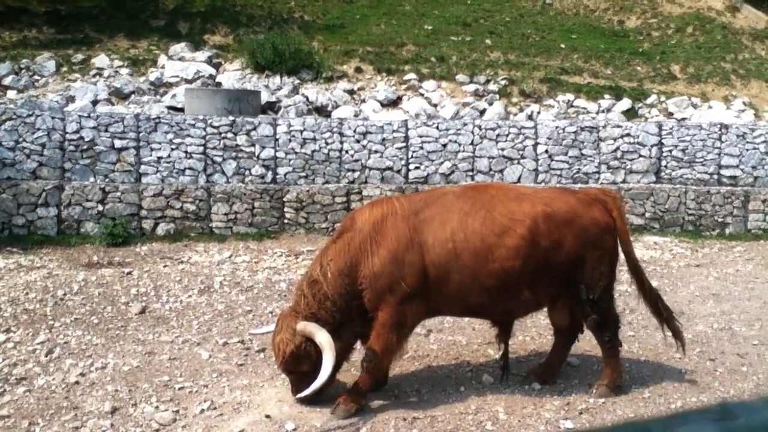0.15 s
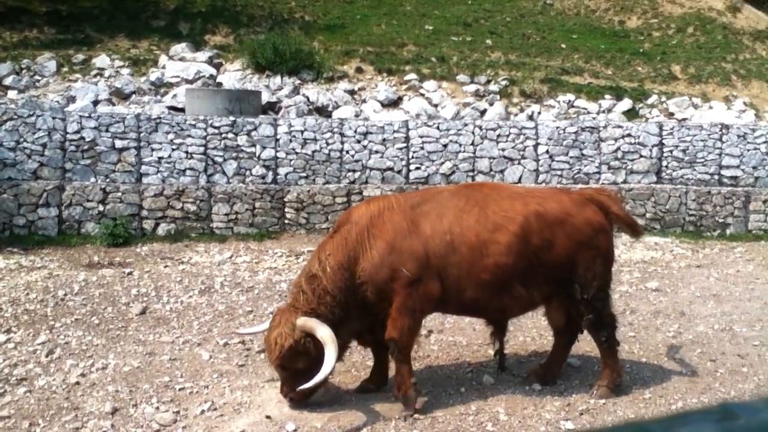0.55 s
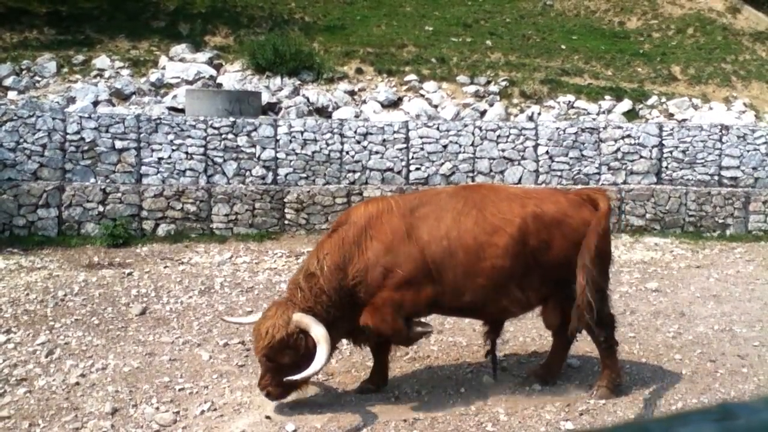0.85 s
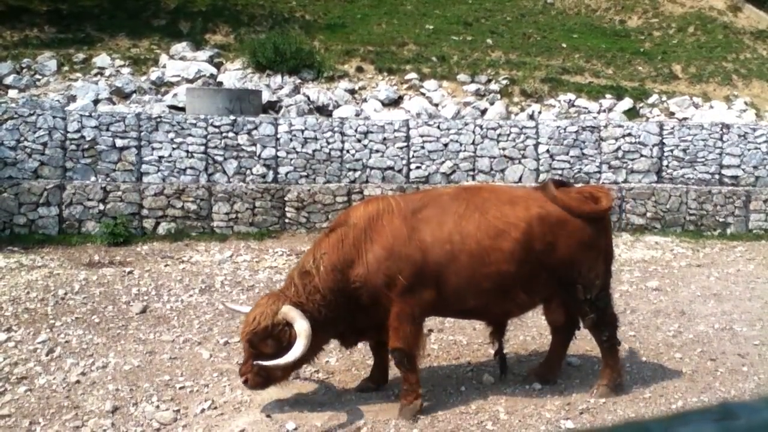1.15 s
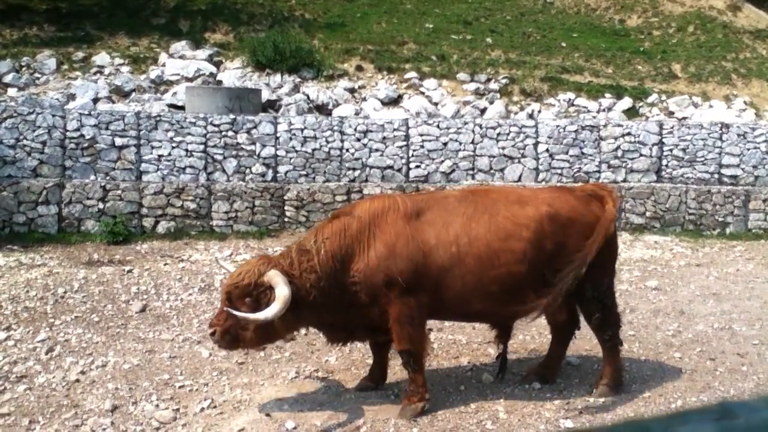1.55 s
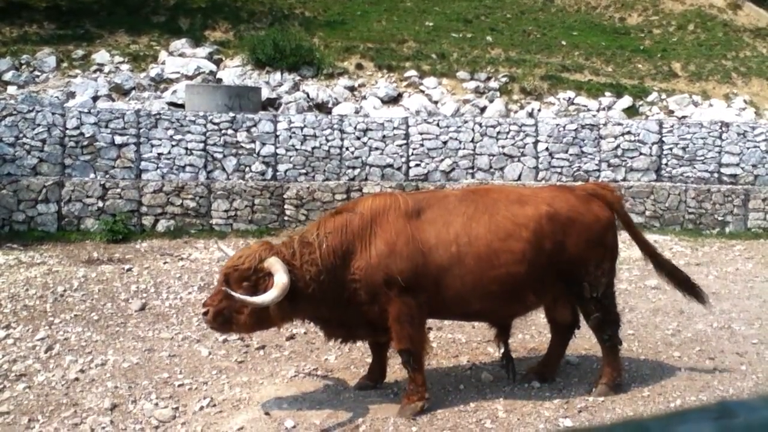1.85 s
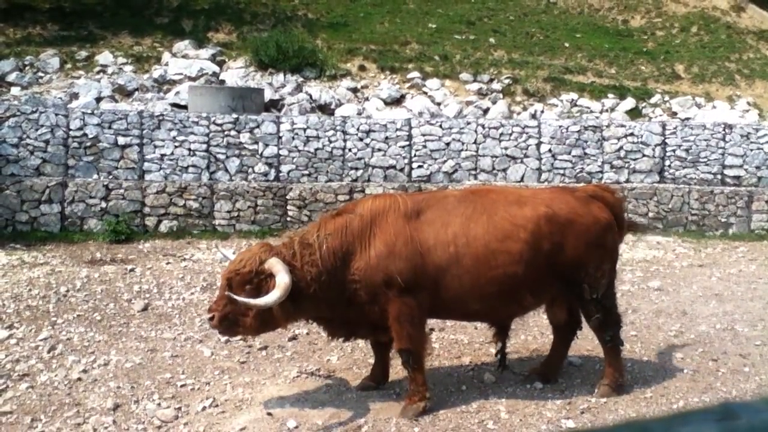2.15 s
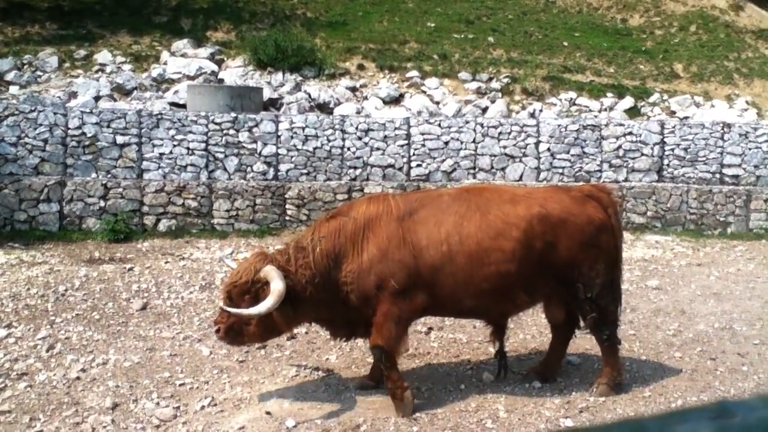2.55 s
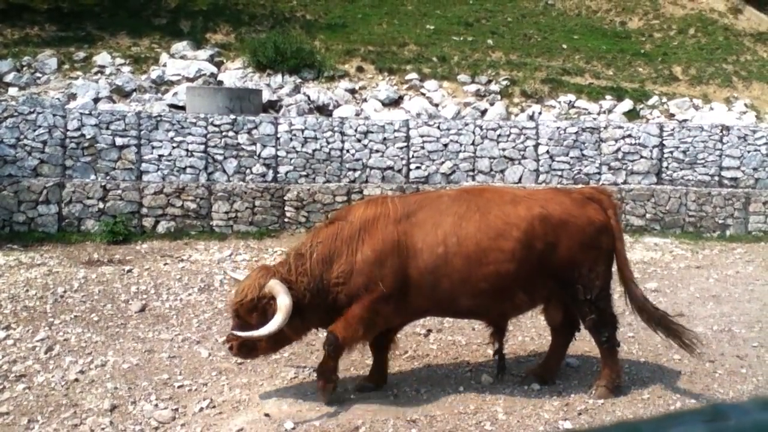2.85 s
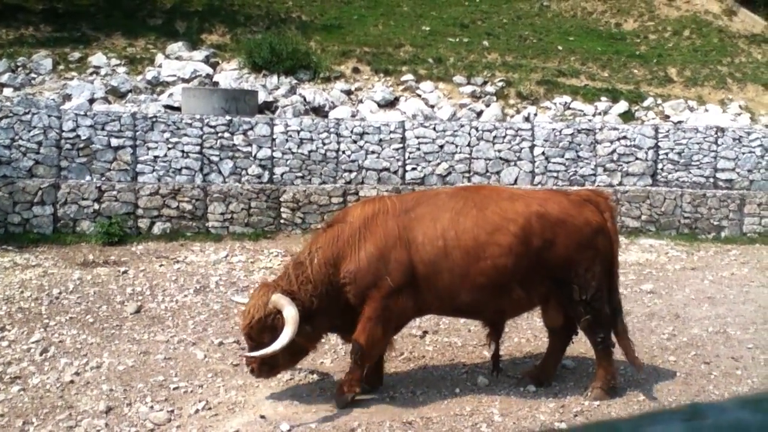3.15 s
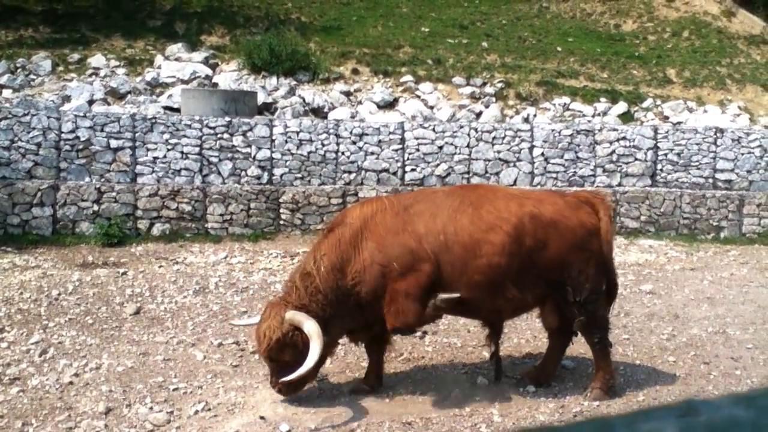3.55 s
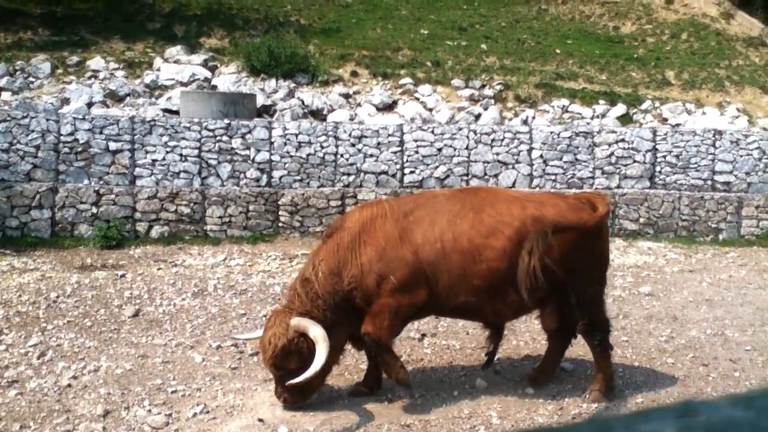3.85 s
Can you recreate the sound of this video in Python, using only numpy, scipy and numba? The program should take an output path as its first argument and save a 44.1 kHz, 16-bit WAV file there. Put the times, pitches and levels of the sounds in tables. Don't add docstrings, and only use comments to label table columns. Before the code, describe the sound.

Long deep bull bellow climbing in pitch, with hoof thuds, stone cracks and gravel crunching outdoors

```python
import sys
import numpy as np
from scipy import signal
from scipy.fft import rfft, irfft
from scipy.io import wavfile
from scipy.ndimage import uniform_filter1d
from numba import njit

SR = 44100
rng = np.random.default_rng(int(sys.argv[2]) if len(sys.argv) > 2 else 0)


def to_wav(sig):
    pcm = np.clip(np.atleast_2d(sig), -1, 1) * 32767
    pcm = np.round(pcm).astype(np.int16)
    wavfile.write(sys.argv[1], SR, pcm.T)


def voltage_ratio(level):
    return 10 ** (np.asarray(level, float) / 20)


N = 176400

# t/s, pitch f/Hz, chest level/dB, throat level/dB, nose level/dB, mouth buzz level/dB
BELLOW = [
    [(1.3, 107, -36, -49, -55, -54), (1.324, 108.4, -34, -46.5, -46.5, -49),
     (1.424, 109.1, -38, -24, -49, -54), (1.548, 113.2, -37, -26, -43, -56),
     (1.838, 119.3, -33, -22.5, -36.5, -51), (2.036, 120.4, -36, -21, -37.5, -59),
     (2.068, 124.6, -31, -23.5, -41, -62), (2.158, 125.2, -30, -27.5, -32, -53.5),
     (2.45, 128.7, -29.5, -24, -27.5, -46)],
    [(2.45, 129, -28.5, -22.5, -30.5, -68), (2.648, 132, -27, -28, -32, -61),
     (2.686, 129.7, -27.5, -26, -32, -50.5), (3.23, 130, -26, -20.5, -30.5, -68),
     (3.382, 127, -29, -20.5, -25.5, -63), (3.594, 128.6, -25.5, -21.5, -36, -45),
     (3.766, 130.4, -26, -21.5, -27.5, -79), (3.878, 137, -21.5, -21, -33, -55),
     (4.0, 145, -17.5, -20.5, -33.5, -50)],
]
ATTACK_S, PITCH_JITTER, SHIMMER_DB = 0.01, 0.0045, 0.38
# t/s, shift f/Hz, half length t/s
PITCH_JOLTS = [
    (3.298, 2, 0.031),
    (3.362, -4, 0.03115),
    (3.463, 3.5, 0.0361),
    (3.53, -2.2, 0.031),
]
# middle t/s, half length t/s, level/dB
FLUTTER_BURSTS = [(1.95, .1, -46), (2.21, 0.13, -47), (2.42, .03, -37), (2.521, .03, -36),
                  (2.63, 0.053, -33), (2.78, 0.051, -36.5), (2.992, .1, -31.5), (3.172, .03, -28.5),
                  (3.277, 0.048, -27.5), (3.371, .015, -26), (3.406, 0.015, -27.5), (3.525, 0.075, -28),
                  (3.66, 0.045, -37), (3.76, .045, -31), (3.85, .03, -32), (4.9, 0.077, -35)]
# multiple of pitch, level/dB
HALF_LINES = [(.5, -32), (1.5, 0), (2.5, -12), (3.5, -21)]
FLUTTER_PATCH_DB = 1.4
# f/Hz, width f/Hz, level/dB
MOUTH_MODES = [(1336, 80, 20), (1420, 30, -18), (1774, 43, -2), (2575, 100, -1.5)]
FOLD_BREATH, MOUTH_PATCH_DB, PULSE_SCATTER_DB = 0.5, 0.5, 1.8
# middle t/s, half length t/s, level/dB
MOUTH_OPENINGS = [(1.59, .06, -43), (2.07, .05, -46), (2.46, .06, -41), (2.6, .08, -42), (2.885, .1, -36.5),
                  (3.02, .03, -39), (3.24, .045, -39.5), (3.32, .015, -39), (3.435, .015, -36),
                  (3.465, .012, -39), (3.52, .045, -37), (3.605, .016, -38), (3.645, .013, -37),
                  (3.685, .055, -34), (3.755, .014, -33), (3.787, .014, -33), (3.84, .045, -34),
                  (3.93, .035, -42), (3.98, .015, -41)]
# middle t/s, half length t/s, level/dB
SEVENTH_PARTIAL = (2.08, .36, -47)
# from t/s, to t/s, f/Hz, width f/Hz, level/dB
NASAL_MODES = [(3.72, 4.1, 800, 60, -50), (3.6, 4.1, 545, 80, -48), (3.0, 3.3, 520, 110, -49),
               (3.76, 4.1, 690, 80, -50), (2.48, 2.78, 2600, 110, -53), (3.1, 3.3, 2600, 110, -54),
               (3.84, 4.1, 2620, 110, -51), (3.85, 4.1, 1730, 90, -47)]

# t/s, peak level/dB, ring f/Hz, dull part level/dB
STONE_KNOCKS = [(0.1412, -22.5, 1420, -32), (0.1485, -20.5, 1500, -28), (0.1632, -9.5, 1490, -16),
                (0.174, -19.5, 1290, -26), (0.401, -21.5, 1360, -33), (0.4062, -25, 1390, -24),
                (0.5318, -21.5, 605, -29), (0.5586, -30, 740, -31.5), (0.7132, -25.5, 583, -29),
                (1.1737, -33, 1160, -28.5), (1.1919, -33, 799, -32.5), (1.5075, -29, 1290, -34),
                (3.0413, -31, 970, -17), (3.096, -26.5, 1000, -33), (3.2014, -37, 1360, -46),
                (3.5019, -38, 1360, -29), (3.54, -50, 1330, -49), (3.712, -35, 1360, -45)]
# f/Hz, width f/Hz, level/dB
STONE_MODES = [(3160, 210, 2.5), (3570, 840, 2), (4320, 82, -3), (6400, 1100, -2.5), (7260, 1500, -16.5),
               (9000, 1100, -6.5), (11900, 4000, -19.5)]
CRACK_DB, DULL_DB, CRACK_S, DULL_S = 3, 5, 0.0025, 0.0013
# start t/s, length t/s, level/dB, brightest f/Hz
HOOF_DRAGS = [(0.151, 0.17, -40, 2980), (0.389, 0.1, -39.5, 3500), (0.478, 0.17, -42.5, 3800),
              (0.708, 0.33, -52.5, 9100), (2.957, 0.091, -47, 9240), (3.028, 0.16, -42, 4927),
              (3.119, 0.034, -40.5, 3400), (3.176, 0.086, -37.5, 2840), (3.314, 0.044, -42, 4750),
              (3.04, 0.2, -40, 1110), (3.341, 0.11, -29, 1840), (3.487, 0.046, -47.5, 9020),
              (3.31, 0.2, -39.5, 785), (3.546, 0.35, -57, 12000)]
# f/Hz, level/dB
GRAVEL_COLOUR = [(400, 7), (1200, 8.5), (2800, -6.5), (3800, -2.5), (5300, -9), (6600, -4.5), (9500, -12),
                 (15900, -5)]
GRAIN_SPREAD_DB, GRAINS_PER_S, GRAIN_SHARE = 4, 450, 0.45
# t/s, level/dB, ring f/Hz
PEBBLES = [(.229, -41, 2540), (0.4389, -31.5, 3340), (.218, -31, 1480), (0.4812, -39, 4270),
           (.4889, -43, 3540), (0.503, -33, 3240), (.57, -31.5, 6300), (.586, -32.5, 4160),
           (0.7478, -36, 6800), (1.176, -37, 4250), (1.1913, -29, 4140), (1.348, -41.5, 6500),
           (1.5071, -27, 6700), (3.05, -25, 900), (3.059, -32, 1600), (3.076, -27, 1670),
           (3.103, -27, 1550), (3.126, -35, 2160), (3.133, -32, 647), (3.139, -29, 1500),
           (3.1843, -31, 1000), (3.1878, -35, 3090), (3.202, -29, 2570), (3.301, -33, 3550),
           (3.3253, -31, 3780), (3.326, -40, 6500), (3.3316, -26, 3900), (3.338, -29, 3800),
           (3.3445, -23, 4130), (3.346, -39, 6550), (3.3516, -25, 6500), (3.353, -23, 1720),
           (3.358, -22.5, 3900), (3.367, -23, 2360), (3.372, -18.5, 1740), (3.377, -30, 1140),
           (3.385, -20, 1900), (3.385, -39, 7900), (3.395, -32, 1760), (3.405, -24, 1840),
           (3.412, -25, 1000), (3.418, -29.5, 6140), (3.423, -29, 1650), (3.54, -36, 7460),
           (3.64, -40, 7000), (3.711, -41, 9510)]
PEBBLE_S, PEBBLE_WIDTH, PEBBLE_EDGE_DB = 0.0025, 0.14, -22
# t/s, level/dB, f/Hz, t60 t/s
HOOF_FALLS = [
    (0.014, -16.5, 273, 0.062),
    (0.031, -26, 89, 0.13),
    (2.349, -18, 85.1, 0.094),
    (2.46, -24, 61, 0.1),
    (2.595, -23, 59.3, 0.14),
    (3.042, -4, 523, 0.024),
]
# delay t/s, level/dB
WALL_ECHOES = [
    (.021, -23.5),
    (0.035, -19),
]

# t/s, start f/Hz, end f/Hz, level/dB
SPARROW_CHIRPS = [
    (2.683, 5700, 3850, -50),
    (3.0, 6400, 4850, -50),
]
CHIRP_S, CHIRP_FALL_S = 0.06, 0.011
WIND_HZ, WIND_DB, WIND_FADE_S = 44, -40, 0.5
# f/Hz, level/dB per Hz
WASH_COLOUR = [(18, -56), (30, -11), (59, -11), (93, 1), (265, 0), (403, -8), (460, -6), (2050, -14.5),
               (15900, -47)]
WASH_DB = -34.5
# t/s, level/dB, treble tilt/dB per octave
TRAFFIC_SWELL = [(0, -0.5, 1.5), (.8, 0, 0.5), (2.2, 0, 1), (4, -0.5, 0.43)]
# f/Hz, width f/Hz, level/dB, peak t/s, lasting t/s
TRAFFIC_DRONES = [(2044, 200, -45, 0.64, 0.47), (475, 70, -47, 1.07, 1.16), (1880, 700, -45, 1.79, 0.45),
                  (6870, 2800, -57.5, 4.7, 6.5), (9940, 4900, -62.5, 3.4, 14), (1610, 470, -50, 1.16, 1.1)]
# multiple of idle f, level/dB
IDLE_LINES = [(1, -49), (2, -47.5), (4, -53.5)]
IDLE_HZ = 64.6
WHINE_HZ, WHINE_DB = 14994, -80
TOP_HZ = 15900


@njit
def svf(x, hz, width):
    y, b, l = np.empty(len(x)), 0., 0.
    g, k = np.tan(np.pi * hz / SR), width / hz
    for i in range(len(x)):
        v = (b + g * (x[i] - l)) / (1 + g * (g + k))
        b, l, y[i] = 2 * v - b, l + 2 * g * v, k * v
    return y


def ring(x, modes):
    out = 0
    for f, w, db in modes:
        once = svf(x, 1. * f, 1.55 * w)
        out = out + voltage_ratio(db) * svf(once, 1. * f, 1.57 * w)
    return out


def level(x, db):
    return x * voltage_ratio(db) / np.sqrt(np.mean(x ** 2))


def walk(rate):
    k = int(SR / rate)
    held = np.repeat(rng.standard_normal(N)[:N // k + 1], k)
    return 1.471 * uniform_filter1d(uniform_filter1d(held, k), k)[:N]


def colour(x, points):
    hz, db = np.array(points).T
    f = np.arange(N // 2 + 1) * SR / N + 1
    return irfft(rfft(x) * voltage_ratio(np.interp(np.log(f), np.log(hz), db)), N)


def bump(t, mid, half):
    return np.exp(-np.abs((t - mid) / half) ** 3)


def swells(t, events):
    return sum(voltage_ratio(db) * bump(t, mid, half) for mid, half, db in events)


def partial(phase, k, db):
    return np.sqrt(2) * voltage_ratio(db) * np.sin(2 * np.pi * k * phase + k * k)


def fold_pulses(phase):
    pulses = np.diff(np.floor(phase), prepend=0) * voltage_ratio(PULSE_SCATTER_DB * walk(100))
    breath = np.exp(-(phase % 1) / 1.7) * rng.standard_normal(N)
    return level(pulses, 0) + FOLD_BREATH * level(breath, 0)


def bull(t):
    s, *contours = np.vstack(BELLOW).T
    hz, chest, throat, nose, mouth = [np.interp(t, s, v) for v in contours]
    pitch = hz + sum(shift * bump(t, mid, half) for mid, shift, half in PITCH_JOLTS)
    phase = np.cumsum(pitch * (1 + PITCH_JITTER * walk(45))) / SR

    out = np.zeros(N)
    for k, db in enumerate((chest, throat, nose), 1):
        out += partial(phase, k, db + SHIMMER_DB * walk(23.44))
    halves = sum(partial(phase, k, db + FLUTTER_PATCH_DB * walk(40)) for k, db in HALF_LINES)
    out += swells(t, FLUTTER_BURSTS) * halves

    folds = fold_pulses(phase)
    buzz = level(ring(svf(folds, 1625.0, 420.0), MOUTH_MODES), 0)
    opening = voltage_ratio(mouth) + swells(t, MOUTH_OPENINGS)
    out += buzz * voltage_ratio(MOUTH_PATCH_DB * walk(21.4)) * opening

    mid, half, db = SEVENTH_PARTIAL
    out += bump(t, mid, half) * partial(phase, 7, db + 2.5 * walk(20))
    for start, end, f, w, db in NASAL_MODES:
        tone = ring(svf(folds, 1. * f, 2. * w), [(f, w, 0)])
        out += level(tone, db) * np.clip(np.minimum(t - start, end - t) / 0.022, 0, 1)
    return out * np.clip((t - s[0]) / ATTACK_S + 1, 0, 1)


def knocks(t):
    crack, dull = np.zeros(N), np.zeros(N)
    noise, u = np.sign(rng.standard_normal(N)), t[:2000]
    for s, db, f, dull_db in STONE_KNOCKS:
        i = int(s * SR)
        crack[i:i + 2000] += voltage_ratio(db + CRACK_DB) * np.exp(-u / CRACK_S) * noise[i:i + 2000]
        damped = np.e * u / (u + 0.0005) * np.exp(-u / DULL_S)
        dull[i:i + 2000] += voltage_ratio(dull_db + DULL_DB) * damped * np.sin(2 * np.pi * f * u)
    return dull + ring(crack, STONE_MODES)


def scrapes(t):
    size = voltage_ratio(GRAIN_SPREAD_DB * np.minimum(rng.exponential(size=N), 3))
    grains = size * (rng.random(N) < GRAINS_PER_S / SR)
    grains = uniform_filter1d(grains, size=40) * rng.standard_normal(N)
    crunch = GRAIN_SHARE * level(grains, 0) + 0.5 * rng.standard_normal(N)
    crunch = colour(crunch, GRAVEL_COLOUR)
    crunch = signal.sosfilt(signal.butter(2, 11500, fs=SR, output="sos"), crunch)
    out = np.zeros(N)
    for s, length, db, f in HOOF_DRAGS:
        stroke = np.sin(np.pi * np.clip((t - s) / length, 0, 1) ** 0.41)
        out += level(svf(crunch, 1. * f, 1.64 * f), db) * stroke
    return out


def ticks(t):
    out, u = np.zeros(N), t[:900]
    for s, db, f in PEBBLES:
        i = int(s * SR)
        hit = rng.standard_normal(len(u)) * np.exp(-u / PEBBLE_S)
        tick = svf(hit, 1. * f, PEBBLE_WIDTH * f)
        edge = voltage_ratio(PEBBLE_EDGE_DB) * svf(hit, 6700.0, 6900.0)
        out[i:i + len(u)] += voltage_ratio(db) * (tick / np.abs(tick).max() + edge)
    return out


def wall(feet):
    return sum(voltage_ratio(db) * np.roll(feet, int(s * SR)) for s, db in WALL_ECHOES)


def thuds(t):
    out = np.zeros(N)
    for s, db, f, t60 in HOOF_FALLS:
        u = np.clip(t - s, 0, None)
        out += voltage_ratio(db - 60 * u / t60) * np.sin(2 * np.pi * f * u) * (1 - np.exp(-u / 0.01))
    return out


def sparrows(t):
    out = np.zeros(N)
    for s, f0, f1, db in SPARROW_CHIRPS:
        u = np.clip(t - s, 0, CHIRP_S)
        pitch = f1 + (f0 - f1) * np.exp(-u / CHIRP_FALL_S)
        whistle = np.sin(2 * np.pi * np.cumsum(pitch) / SR)
        out += voltage_ratio(db) * np.sin(np.pi * u / CHIRP_S) ** 0.5 * whistle
    return out


def wind(t):
    rumble = svf(rng.standard_normal(N), 1. * WIND_HZ, 30.)
    return level(rumble, WIND_DB) * np.exp(-t / WIND_FADE_S)


def traffic(t):
    s, db, treble = np.array(TRAFFIC_SWELL).T
    wash = colour(rng.standard_normal(N), WASH_COLOUR)
    tilt = np.interp(t, s, treble)
    out = 0
    for hz in 32 * 2 ** np.arange(0, 9.2, 0.5):
        out = out + svf(wash, hz, hz / 1.25) * voltage_ratio(1.6 * walk(6.69) + tilt * np.log2(hz / 500))
    out = level(out, WASH_DB - 4) * voltage_ratio(np.interp(t, s, db))
    for f, w, db, peak, lasting in TRAFFIC_DRONES:
        drone = level(ring(rng.standard_normal(N), [(f, w, 0)]), db)
        out += drone * np.exp(-((t - peak) / lasting) ** 2)
    return out


def engine(t):
    turn = np.cumsum(IDLE_HZ * (1 + 0.0204 * walk(8))) / SR
    out = np.zeros(N)
    for k, db in IDLE_LINES:
        out += voltage_ratio(db + 1.2 * walk(19)) * np.sqrt(2) * np.sin(2 * np.pi * k * turn)
    return out


def whine(t):
    return voltage_ratio(WHINE_DB) * np.sqrt(2) * np.sin(2 * np.pi * WHINE_HZ * t)


def scene():
    t = np.arange(N) / SR
    feet = knocks(t) + scrapes(t) + ticks(t)
    animal = bull(t) + feet + wall(feet) + thuds(t)
    yard = sparrows(t) + wind(t) + traffic(t) + engine(t) + whine(t)
    return (animal + yard)[None]


def low_pass(x):
    return signal.sosfilt(signal.butter(12, 16030, fs=SR, output="sos"), x)


def record(dry):
    steep = signal.ellip(8, 0.2, 60, TOP_HZ, fs=SR, output="sos")
    mix = signal.sosfilt(steep, dry)
    return low_pass(mix)


dry = scene()
out = record(dry)
to_wav(out)
```